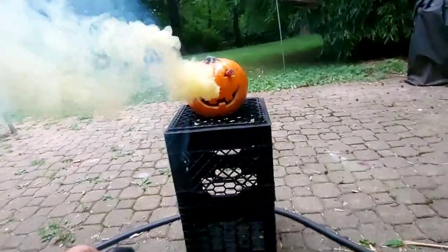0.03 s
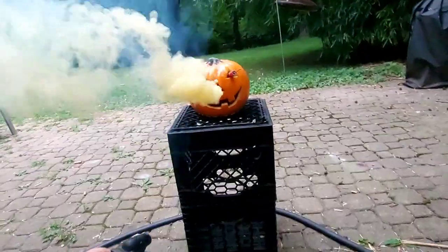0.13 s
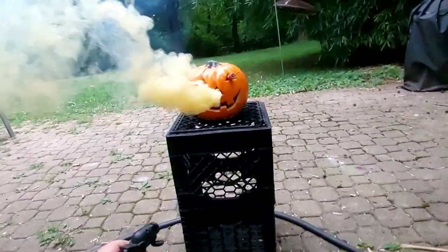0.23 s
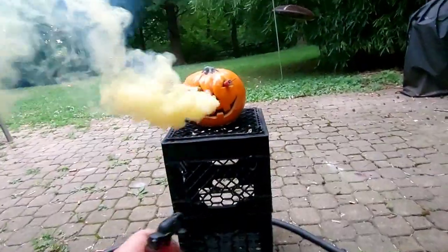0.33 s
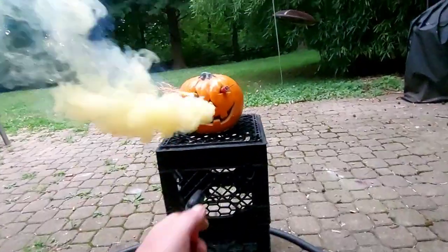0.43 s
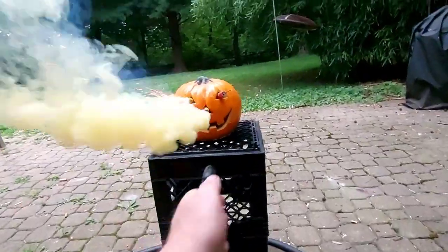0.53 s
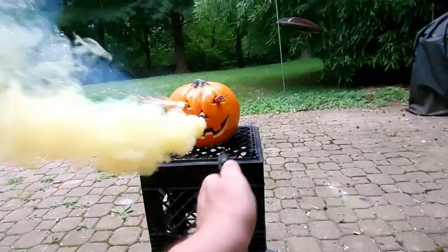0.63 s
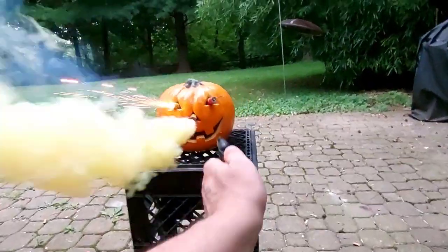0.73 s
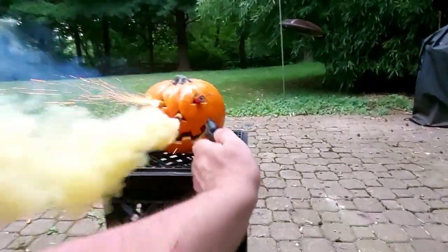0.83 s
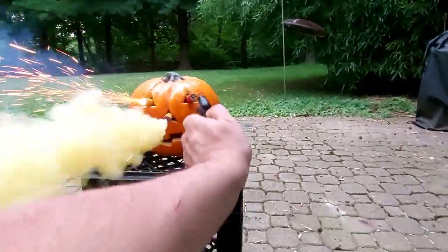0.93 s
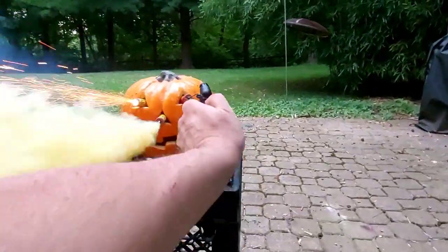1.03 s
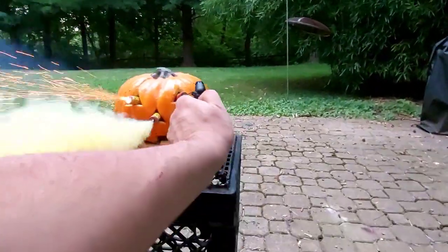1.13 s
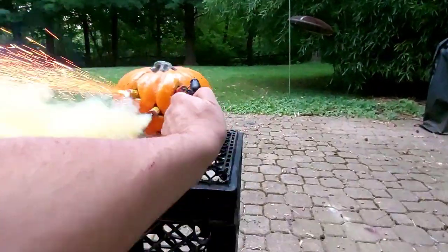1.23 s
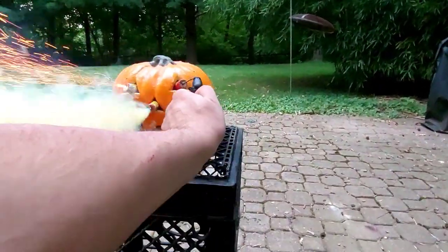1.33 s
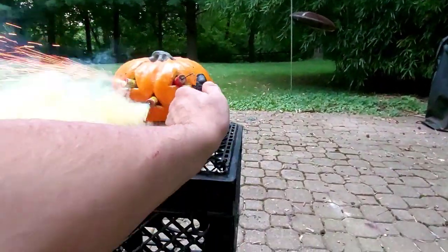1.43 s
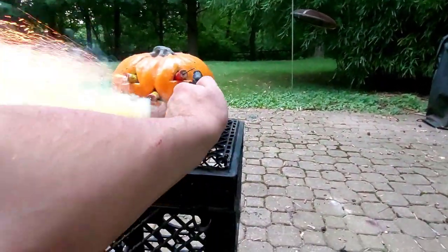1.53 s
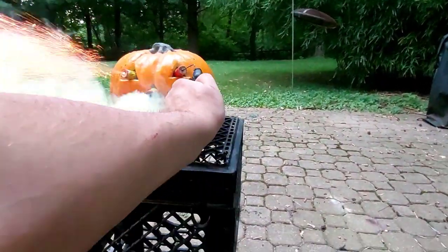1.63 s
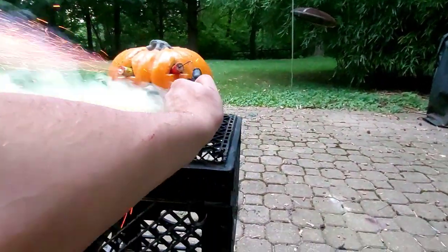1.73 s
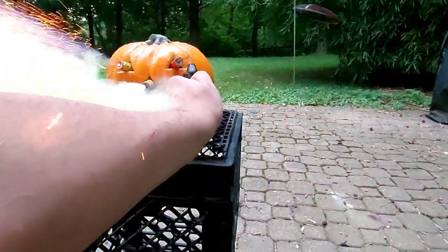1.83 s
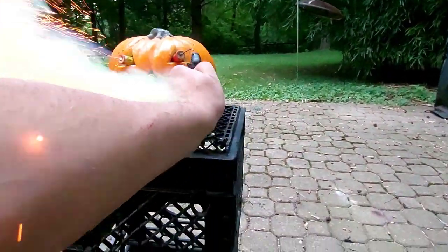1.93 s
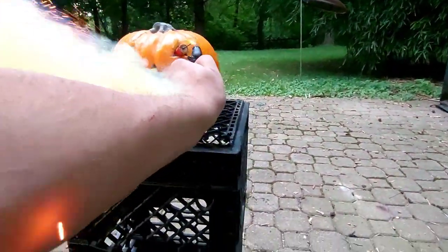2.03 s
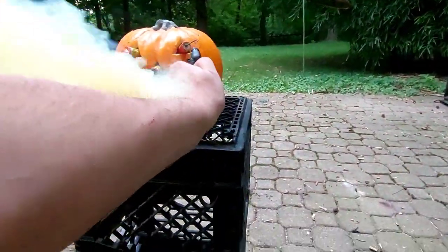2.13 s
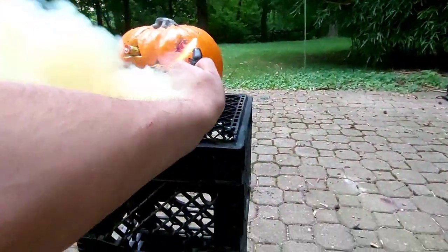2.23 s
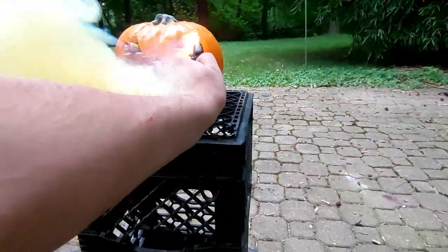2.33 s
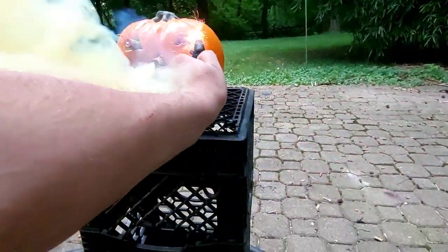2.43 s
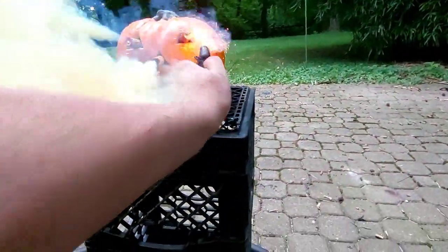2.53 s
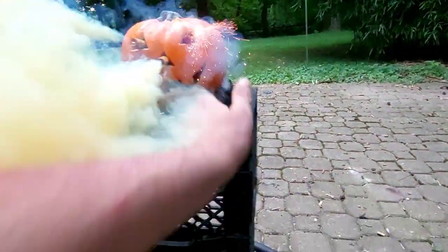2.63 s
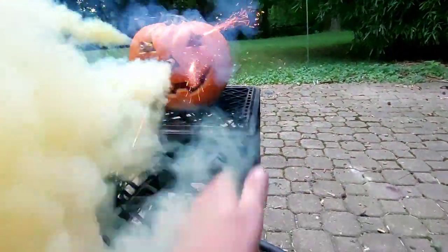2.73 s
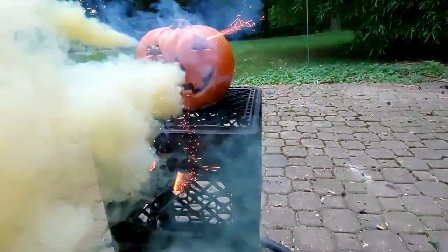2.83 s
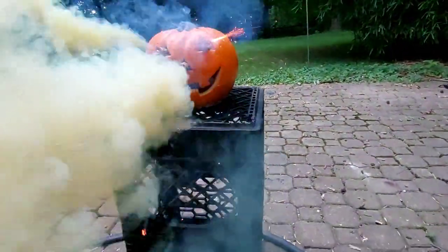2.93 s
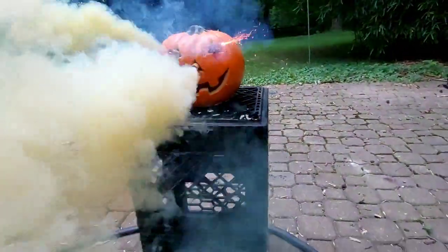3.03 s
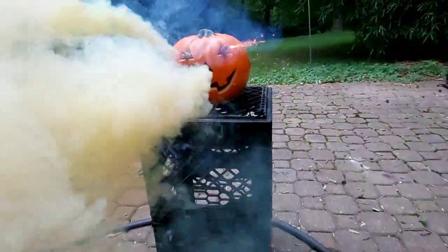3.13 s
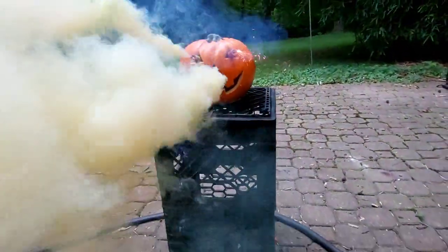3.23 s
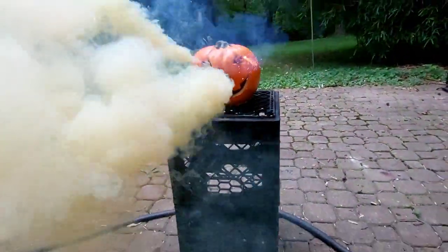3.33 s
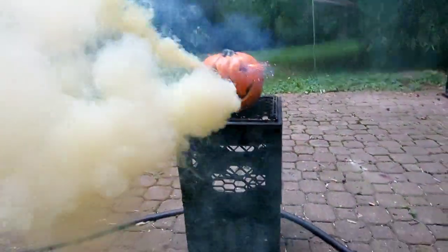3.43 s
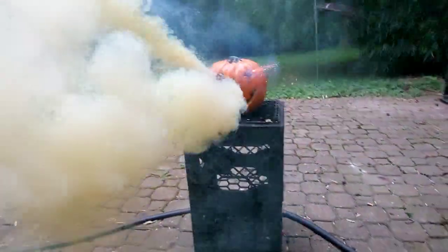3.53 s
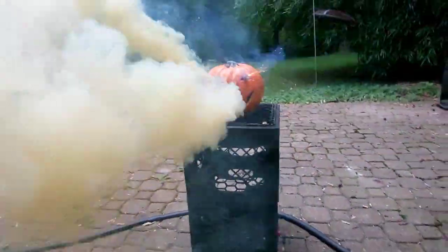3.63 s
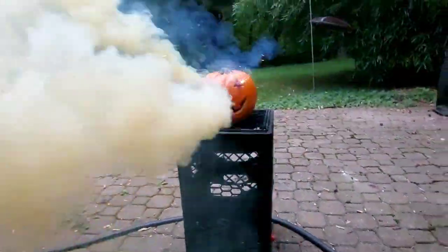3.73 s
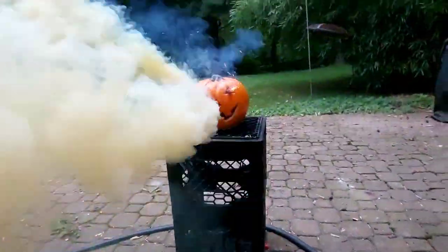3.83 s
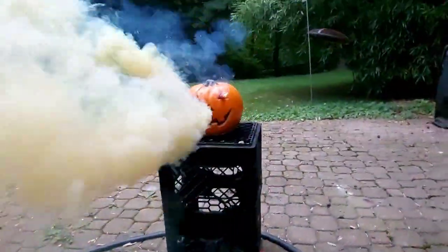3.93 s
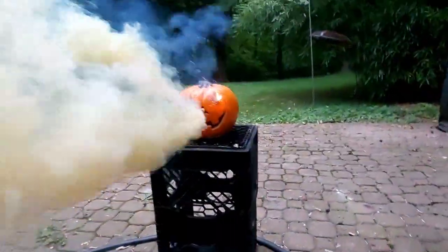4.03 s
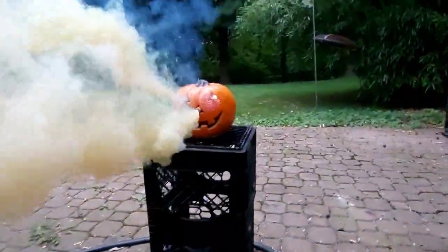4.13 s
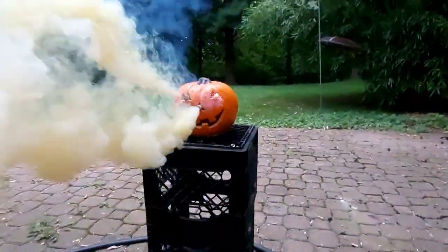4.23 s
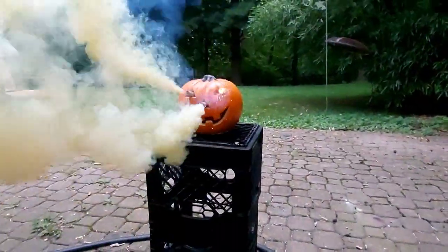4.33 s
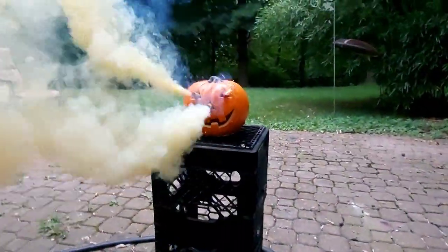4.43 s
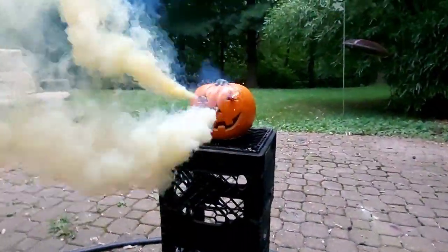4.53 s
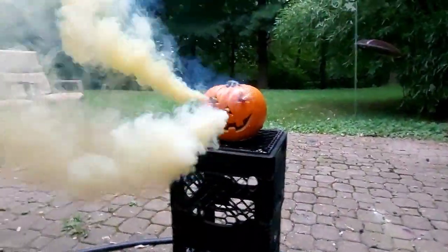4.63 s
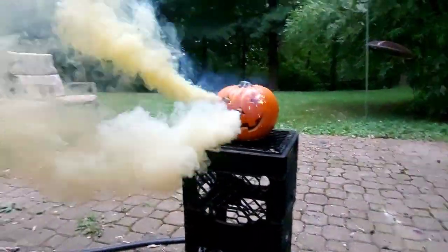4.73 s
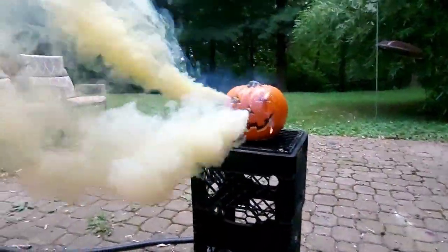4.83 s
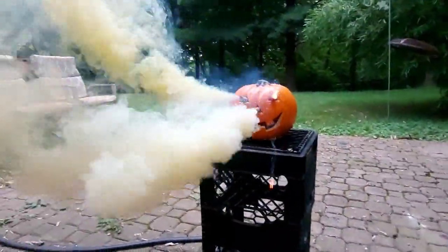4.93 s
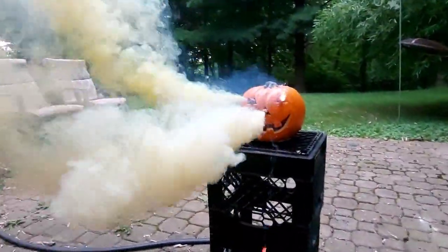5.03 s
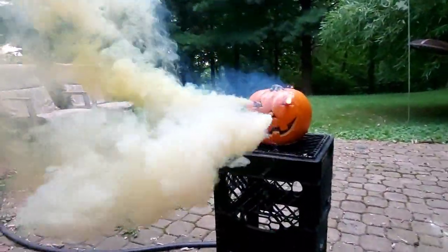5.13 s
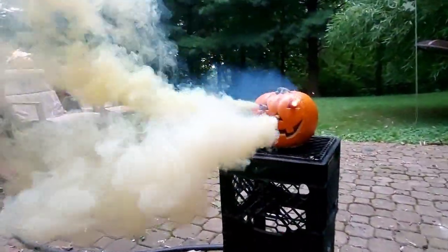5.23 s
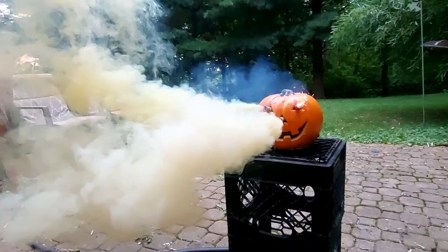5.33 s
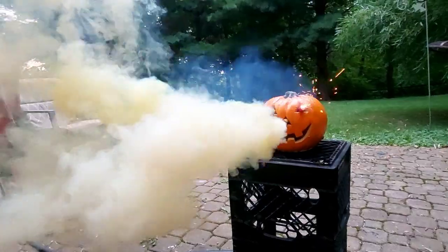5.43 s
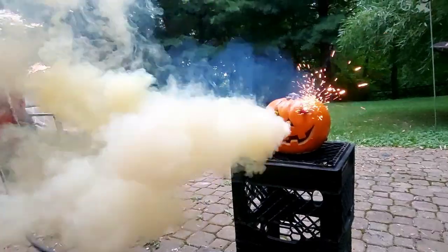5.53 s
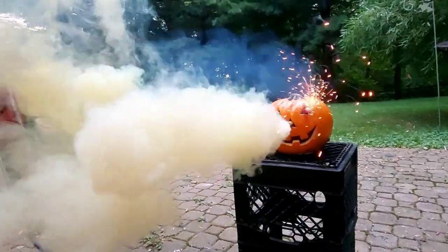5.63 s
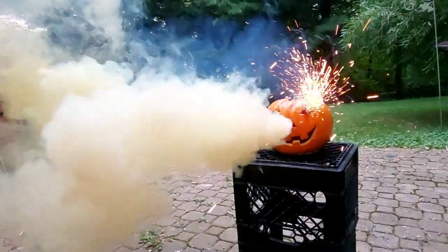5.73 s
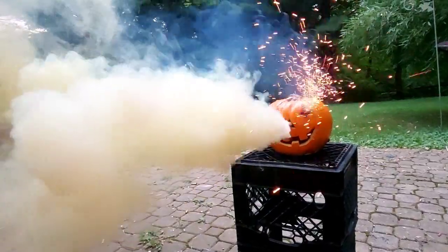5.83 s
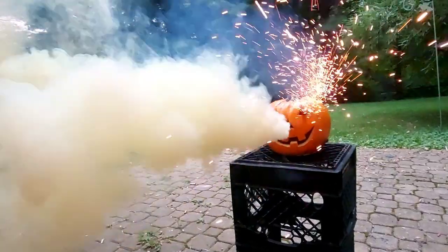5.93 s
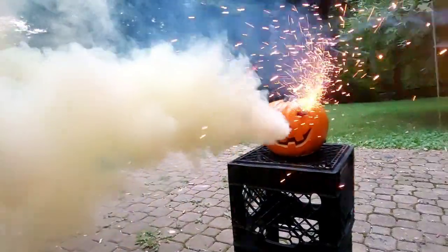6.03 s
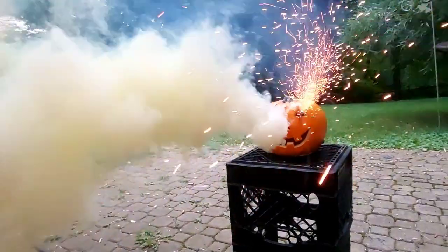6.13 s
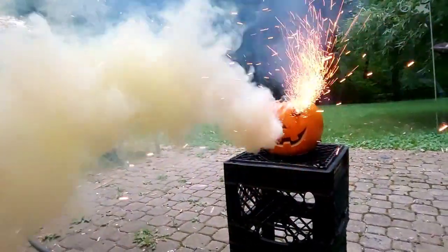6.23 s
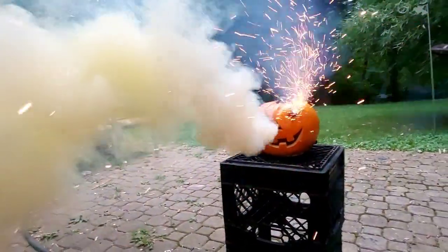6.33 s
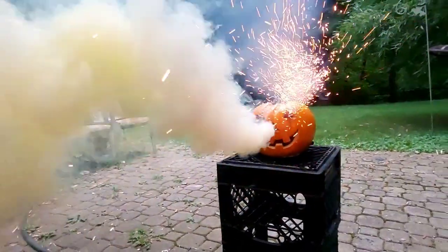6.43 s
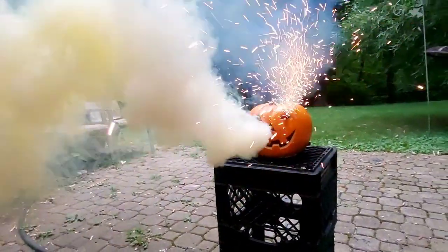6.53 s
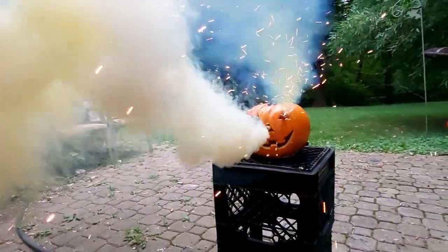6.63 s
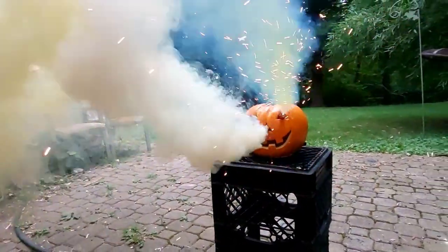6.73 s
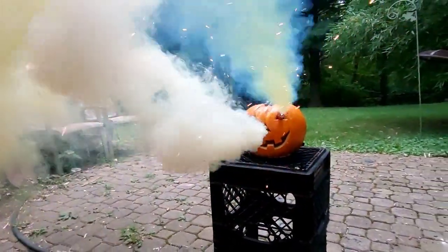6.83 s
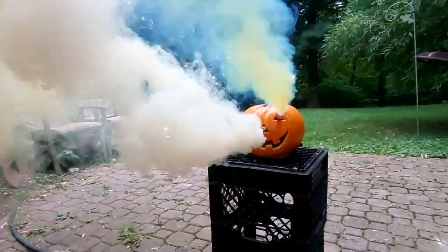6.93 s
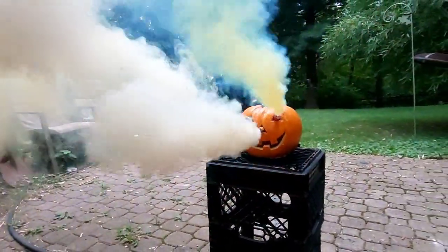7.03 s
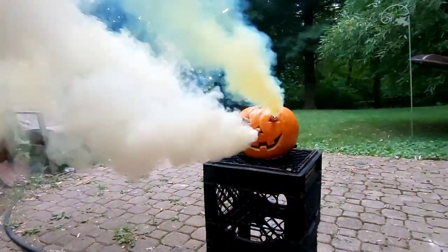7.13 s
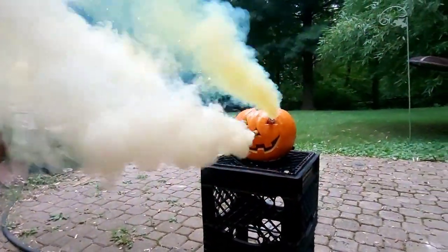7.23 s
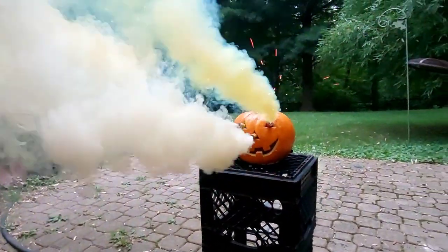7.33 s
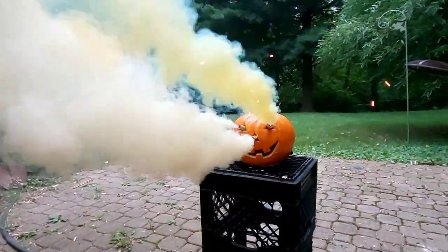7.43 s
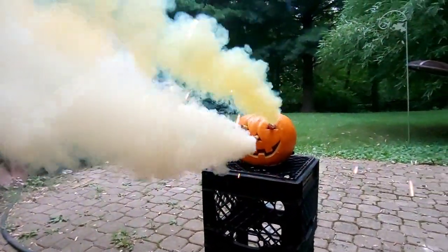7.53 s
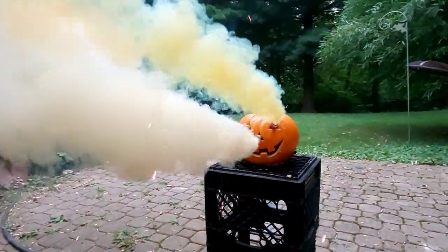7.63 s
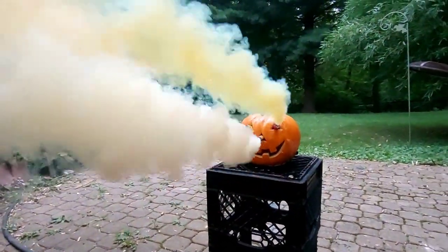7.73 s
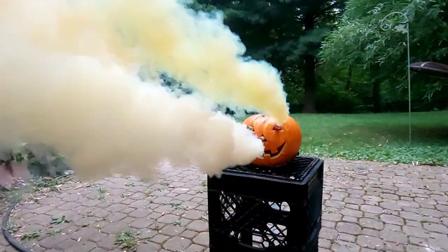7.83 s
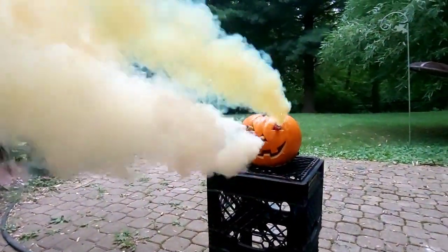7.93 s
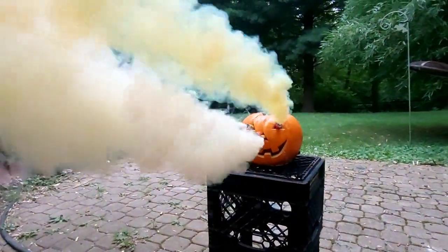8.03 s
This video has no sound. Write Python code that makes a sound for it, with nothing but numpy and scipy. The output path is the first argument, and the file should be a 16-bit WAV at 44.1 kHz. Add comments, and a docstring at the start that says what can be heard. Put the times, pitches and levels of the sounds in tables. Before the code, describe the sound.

Smoke bombs burn inside a hollow pumpkin on an outdoor patio. A soft hiss and low throbbing hum swell into a bright, forceful sizzle with woofs and scattered pops, then drop back. After a steadier hissing stretch, a second surge ends in a dense, louder volley of pops, then subsides to hiss. The handheld stereo microphone moves in close, backs away and sways.

```python
"""Outdoor patio: smoke bombs burn inside a carved pumpkin on a plastic crate.
Their jets, bands of fluttering noise, hiss and surge twice; each surge ends in separate pops, paired pressure pulses.
The hollow pumpkin hums, an unsteady tone over low rumble, and flame woofs and whooshes inside it.
The microphone moves in close, then backs away and sways; echoes and a scattered wash surround the source."""
import sys
import numpy as np
from scipy import signal
from scipy.fft import rfft, irfft, next_fast_len
from scipy.io import wavfile
from scipy.ndimage import uniform_filter1d

SR = 44100
rng = np.random.default_rng(int(sys.argv[2]) if len(sys.argv) > 2 else 0)


def unload_wav(signal):
    """Save mono or channel-first audio to the path in sys.argv[1] as 16-bit WAV at rate SR, clipped to [-1, 1]."""
    wavfile.write(
        sys.argv[1],
        SR,
        np.round(np.clip(np.atleast_2d(signal).T, -1, 1) * 32767).astype(np.int16),
    )


N = 356328
TIME = np.arange(N) / SR   # s
PADDED = next_fast_len(N + 8192)   # room for filter tails
FREQ = np.maximum(np.arange(PADDED // 2 + 1) * SR / PADDED, 1)   # Hz


def from_db(db):
    """Decibels to gain."""
    return 10 ** (np.asarray(db) / 20)


def rms_one(x):
    """Scale to unit power."""
    return x / np.sqrt(np.mean(x ** 2) + 1e-20)


def in_time(rows):
    """Each column of a curve, joined by straight lines, at every sample."""
    time_s, *columns = np.transpose(rows)
    return [np.interp(TIME, time_s, column) for column in columns]


def over_hz(points):
    """A table over frequency, joined on a log axis."""
    hz, value = np.transpose(points)
    return np.interp(np.log(FREQ), np.log(hz), value)


def filtered(x, response):
    """Apply a frequency response."""
    return irfft(rfft(x, PADDED) * response, PADDED)[..., :N]


def drift(rate_hz):
    """Random wandering with spread 1: noise falling off above a rate."""
    return rms_one(filtered(rng.standard_normal(N), 1 / (1 + (FREQ / rate_hz) ** 2)))


def bell(center_s, spread_s):
    """A smooth bump of height 1 around a moment."""
    return np.exp(-.5 * np.minimum(((TIME - center_s) / spread_s) ** 2, 100))


def swells(rows):
    """Brief rises or dips of level, in dB."""
    return sum(db * bell(center_s, spread_s) for center_s, spread_s, db in rows)


def resonance(hz, width_hz):
    """Response of one resonance, 1 at its top."""
    return 1 / (1 + 1j * (FREQ ** 2 - hz ** 2) / (FREQ * width_hz))


# likeness of sound from all sides at the two ears: pitch_hz, correlation
EAR_LIKENESS = [(60, 0.7), (300, 0.28), (700, 0), (1500, 0), (3000, 0), (16000, 0)]


def all_round(colour):
    """Noise of a given response arriving from all sides, partly alike at the two ears."""
    alike = np.clip(over_hz(EAR_LIKENESS), -1, 1)
    mid, side = filtered(rng.standard_normal((2, N)), colour * np.sqrt([1 + alike, 1 - alike]))
    return rms_one(np.array([mid + side, mid - side]))


# draught through the hollow pumpkin, before trims: time_s, hum_db, rumble_db
DRAUGHT = [(0, -50, -53), (.2, -55.5, -62), (.4, -48, -53.5), (1.05, -46, -51.5), (1.2, -58, -56),
           (2.05, -58, -58), (2.4, -73, -67), (2.8, -51.5, -62), (3.12, -62, -66), (3.22, -57, -46.5),
           (3.5, -50.5, -51.5), (3.83, -45, -51), (3.91, -37.5, -53), (4.08, -43, -50), (4.32, -38.5, -50),
           (4.42, -48, -52.5), (4.65, -43, -53.5), (5.3, -43.5, -49.5), (5.53, -53, -53), (5.63, -44, -50),
           (6, -49, -48), (6.55, -54, -56), (6.8, -46.5, -54), (7.2, -57, -58.5), (8.08, -48.5, -53.5)]
# its air resonance, which the hum wanders around: time_s, pitch_hz
HUM_PITCH = [(0, 135.2), (.6, 127), (1.1, 124), (2.8, 132.7), (3.8, 124), (4.2, 110.7), (4.7, 110),
             (5.5, 113.7), (6.2, 121.1), (8.08, 121.6)]
# spectrum of the rumble: pitch_hz, level_db (relative)
RUMBLE_SPECTRUM = [(20, -24), (35, -13), (45, -1), (58, -0.5), (72, -0.5), (88, -8), (108, 1.5), (135, -14),
                   (200, -10.5), (270, -14), (370, -56), (2000, -68)]
THROBS_PER_S, THROB_DEPTH = 11, 0.33   # the hum swells and sags, on average this often


def hollow_hum(waver, wander_hz, hum_trim_db, rumble_trim_db):
    """The jets blow the pumpkin like a bottle: a throbbing hum over the rumble of the billowing smoke."""
    hum_db, rumble_db = in_time(DRAUGHT)
    pitch_hz = in_time(HUM_PITCH)[0] + wander_hz * drift(8.2)
    phase = 2 * np.pi * np.cumsum(pitch_hz) / SR
    throb_hz = THROBS_PER_S * (1 + 0.288 * drift(3.4))
    throb = 1 + THROB_DEPTH * np.cos(2 * np.pi * np.cumsum(throb_hz) / SR)
    unsteady = (1 + waver * drift(21)) * np.cos(phase) + waver * drift(23) * np.sin(phase)
    hum = from_db(hum_db + hum_trim_db) * rms_one(throb * unsteady)
    rumble = from_db(rumble_db + rumble_trim_db) * all_round(from_db(over_hz(RUMBLE_SPECTRUM)))
    return hum + rumble


def jet_noise(spectrum, flutter_db):
    """Turbulence at a vent, its level fluttering with the flow."""
    turbulence = rng.standard_normal(N) * from_db(flutter_db)
    return rms_one(filtered(turbulence, from_db(over_hz(spectrum))))


# force of the jets, before trims: time_s, sizzle_db, hiss_db
JET_FORCE = [(0.04, -47, -49), (.17, -47, -50.5), (.23, -53, -48), (0.42, -50.5, -47), (0.5, -43.5, -50),
             (0.82, -38.5, -47), (0.95, -36.5, -35.5), (1.18, -26, -32.5), (1.45, -26, -35),
             (1.73, -26, -36), (1.88, -31, -46), (2, -28, -43), (2.2, -32.5, -45.5), (2.37, -33.5, -48),
             (2.46, -40, -49), (2.58, -41, -48), (2.76, -42, -48), (2.88, -43, -50), (3.13, -43.5, -46.5),
             (3.29, -47, -49.5), (3.55, -43.5, -48), (3.85, -40.5, -44.5), (3.92, -37.5, -43.5),
             (4.4, -37, -42), (4.7, -35, -41), (4.92, -35, -41.5), (5.34, -33.5, -41.5), (5.63, -32.5, -35),
             (6.0, -29, -33.5), (6.25, -28.5, -34.5), (6.55, -34, -35.5), (6.66, -35, -36.5),
             (6.82, -36.5, -39.5), (7.08, -42, -46.5), (7.6, -39, -45.5), (8.04, -37, -44.5)]
# vigour of the burning, which builds up and cuts out twice, before trims: time_s, sputter_db, flame_rush_db
BURN_VIGOUR = [(0.04, -62, -58), (0.75, -50.5, -44.5), (0.85, -46, -41), (0.93, -48, -40.5),
               (1.28, -48.5, -42), (1.5, -48.5, -45.5), (1.6, -44.5, -37.5), (1.76, -42.5, -39.5),
               (1.79, -50, -39), (1.82, -37.5, -35.5), (1.88, -50, -36), (1.905, -52, -42.5),
               (1.97, -52, -40), (2.0, -45, -34.5), (2.025, -58, -43), (2.14, -45, -41.5),
               (2.19, -53, -46.5), (2.27, -77, -55), (2.42, -54, -41), (2.47, -56.5, -49),
               (3.4, -61, -50.5), (3.68, -55, -57), (3.8, -49.5, -49.5), (4.1, -50.5, -54),
               (4.23, -47, -60), (4.4, -72, -51), (4.49, -55.5, -48), (5.41, -53, -58.5),
               (5.62, -53.5, -40), (5.73, -49.5, -54), (5.8, -47.5, -43.5), (5.93, -43, -46.5),
               (5.99, -43, -37), (6.09, -44, -37), (6.15, -42, -35), (6.3, -38, -32.5), (6.44, -40, -37),
               (6.49, -35.5, -33), (6.545, -39, -40), (6.565, -48, -43), (6.6, -38, -35), (6.64, -56, -44),
               (6.77, -46, -47), (6.85, -45, -54), (6.93, -73, -54), (7.06, -70, -53), (7.22, -78, -54),
               (7.7, -72.5, -55), (8.04, -56.5, -53)]
# spectra of the three ranges: pitch_hz, level_db (relative, per Hz)
SIZZLE_SPECTRUM = [(6000, -59), (9000, -4), (9800, -2), (10800, 1), (12000, 6), (13000, 6), (14500, 6.5),
                   (15700, 6.5), (16000, -28)]
HISS_SPECTRUM = [(1500, -51), (3300, -26), (4200, -3.5), (5000, 3), (6000, 4), (7200, 3.5), (8500, 3.5),
                 (10000, -5), (12000, -9)]
RUSH_SPECTRUM = [(200, -44), (470, -38), (590, -1.5), (720, -3.5), (950, -0.5), (1200, -0.5), (1700, -1.5),
                 (2300, -1), (3200, 1.5), (3700, 1.5), (4400, -0.5), (6000, -8), (12000, -45)]
# the jet spurts or falters for an instant: center_s, spread_s, level_db
JET_FALTERS = [(1.105, 0.016, 2.5), (1.134, 0.012, -7.5), (1.31, 0.008, 0), (6.33, 0.012, -0.5)]
# the flame flares up or sinks in the fountain: center_s, spread_s, level_db
FLAME_FLARES = [(5.8, 0.018, 4.5), (5.975, .014, 3.5), (6.158, 0.024, 4.5), (6.333, 0.023, 3),
                (6.461, 0.01, -16)]


def jets():
    """The escaping gas in three ranges; the bright ones share part of their flutter, the lowest follows the flame."""
    sizzle_db, hiss_db = in_time(JET_FORCE)
    rush_db = in_time(BURN_VIGOUR)[1] + swells(FLAME_FLARES)
    # the flame crackles more, the harder it burns
    grain_db = np.interp(rush_db, [-50, -36], [1.2, 3.6]) * drift(310)
    flow_db = 0.8 * drift(25) + swells(JET_FALTERS)
    sizzle = from_db(sizzle_db + 4.0) * jet_noise(SIZZLE_SPECTRUM, flow_db + .5 * drift(33))
    hiss = from_db(hiss_db + 4.5) * jet_noise(HISS_SPECTRUM, flow_db + .5 * drift(28))
    rush = from_db(rush_db + 2.0) * jet_noise(RUSH_SPECTRUM, 1.7 * drift(37) + grain_db)
    return sizzle, hiss + rush


# standing waves of the hollow shell, heard through its openings: pitch_hz, width_hz, strength
SHELL_MODES = [(1160, 150, 0.34), (1517, 34, 0.75), (1970, 53, 0.99), (2303, 117, 0.66), (2780, 420, 0.25),
               (3460, 60, 0.42), (7300, 180, 0.13)]


def shell(x, level_db):
    """Sound made inside leaves coloured by the shell's standing waves."""
    modes = sum(strength * resonance(hz, width_hz) for hz, width_hz, strength in SHELL_MODES)
    return from_db(level_db) * filtered(x, 1 + modes)


# smoke blowing across the carved mouth: time_s, level_db
MOUTH_LEVEL = [(0, -62.5), (.8, -52), (1.1, -55), (2.3, -66), (3.1, -62), (3.95, -56), (4.35, -65.5),
               (5.5, -56), (8.08, -86)]


def mouth_whistle(hz, width_hz):
    """Smoke across the carved mouth: noise through a broad resonance, an airy, barely pitched whistle."""
    air = filtered(rng.standard_normal(N), resonance(hz, width_hz) ** 2)
    return from_db(in_time(MOUTH_LEVEL)[0]) * rms_one(air)


def blast(t, ms, front=0.3, back=0.61, suction=0.62):
    """A puff of gas: a steep compression, then a longer rarefaction of equal area."""
    u = t * 1000 / ms   # time in units of compression to rarefaction
    push = np.exp(-.5 * (u / front) ** 2)
    early_pull = np.exp(-.5 * ((u - 1) / back) ** 2) / back * suction
    late_pull = np.exp(-.5 * (u - 2) ** 2) * (1 - suction)
    return push - front * (early_pull + late_pull)


def sputter(per_s, ms, spread_db, clump_db):
    """Grains of the charge flare at random and in clumps, each a small blast, in three lengths."""
    born = rng.random(N) < per_s * from_db(clump_db * drift(25)) / SR
    sizes = born * from_db(spread_db * np.minimum(rng.exponential(1, N), 3))
    length_class = rng.integers(0, 3, N)
    t = np.arange(-256, 512) / SR
    total = np.zeros(N)
    for k, scale in enumerate((.6, 1, 1.6)):
        shape = blast(t, ms * scale)
        grains = sizes * (length_class == k)
        total += signal.oaconvolve(grains, shape - shape.mean())[256:256 + N]
    return rms_one(total)


# resonances that colour the long puffs: pitch_hz, width_hz, level_db (relative)
CAVITY_MODES = [(124, 45, 1), (252.5, 47, 4), (354, 73, -4), (497, 54, 0), (680, 100, -34)]
# long puffs follow the sputter up to a ceiling; above it only the short crackle grows
PUFF_DB, PUFF_CEILING_DB = -2.5, -44.5


def burning(crackle_db, uneven_db, crackle_low_hz, ring_db):
    """Fine crackle, slower puffs and single pops; puffs and pops set the cavity ringing."""
    vigour_db = in_time(BURN_VIGOUR)[0] + swells(FLAME_FLARES)
    unsteady = from_db(uneven_db * drift(4.0))
    cavity = sum(from_db(db) * resonance(hz, width_hz) for hz, width_hz, db in CAVITY_MODES)
    thin = signal.butter(2, crackle_low_hz, "high", fs=SR, output="sos")
    short_grains = sputter(per_s=800, ms=0.39, spread_db=3.5, clump_db=3.5)
    crackle = from_db(vigour_db + crackle_db) * rms_one(signal.sosfilt(thin, short_grains))
    long_grains = sputter(per_s=400, ms=0.51, spread_db=3.5, clump_db=2.5)
    puff_db = np.minimum(vigour_db + PUFF_DB, PUFF_CEILING_DB)
    puffs = from_db(puff_db) * rms_one(filtered(long_grains, cavity))
    popping = pops(level_db=-1.45)
    ringing = from_db(ring_db) * filtered(popping, cavity)
    return unsteady * (crackle + puffs) + popping + ringing


# a whoosh falls into the first woof: start_s, end_s, from_hz, to_hz, level_db
FALLING_WHOOSH = (.742, .835, 1430, 300, -41)


def whoosh(width_hz):
    """A narrow band of noise sliding down in pitch."""
    start_s, end_s, from_hz, to_hz, level_db = FALLING_WHOOSH
    along = np.clip((TIME - start_s) / (end_s - start_s), 0, 1)
    phase = 2 * np.pi * np.cumsum(from_hz * (to_hz / from_hz) ** along) / SR
    band = drift(width_hz) * np.cos(phase) + drift(width_hz) * np.sin(phase)
    return from_db(level_db) * np.sin(np.pi * along) * band


# low woofs of flame inside the shell: start_s, decay_s, body_db, opening_blast_db
FLAME_WOOFS = [(0.8193, 0.048, -35.5, -24), (1.7207, 0.019, -28, -26), (1.994, 0.022, -37.5, -30),
               (2.044, 0.012, -30, -27), (4.161, 0.045, -41, -34), (4.24, 0.027, -39, -31),
               (4.552, 0.0068, -48.5, -38), (5.9645, 0.016, -31, -22.5)]
WOOF_FRONT_MS, WOOF_ATTACK_S = 1.6, 0.0045   # length of the opening blast; rise of the body


def woofs(hz, width_hz):
    """A gush of flame opens with a slow blast and stirs the cavity's second resonance, which dies away."""
    body, fronts = np.zeros(N), np.zeros(N)
    for start_s, decay_s, body_db, front_db in FLAME_WOOFS:
        age = np.maximum(TIME - start_s, 0)
        rise = 1 - np.exp(-age / WOOF_ATTACK_S)
        body += from_db(body_db) * rise * np.exp(-np.minimum(age / decay_s, 20))
        fronts += from_db(front_db) * blast(np.clip(TIME - start_s, -.05, .05), WOOF_FRONT_MS)
    stirred = filtered(rng.standard_normal(N), resonance(hz, width_hz) ** 2)
    return body * rms_one(stirred) + fronts


def blasts(rows, shock, shock_ms):
    """Single blasts from rows of (s, dB, ms), each with a snap at its crest, weaker in the quiet ones."""
    out = np.zeros(N)
    for start_s, db, ms in rows:
        near = slice(int((start_s - .005) * SR), int((start_s + .015) * SR))
        t = TIME[near] - start_s
        edge = -t * 1000 / shock_ms
        snap = shock * min(from_db(db + 26), 1) * edge * np.exp(-.5 * edge ** 2)
        out[near] += from_db(db) * (blast(t, ms, front=0.28, back=0.4, suction=0.95) + snap)
    return out


# the loudest pops of gas, as each surge ends, before trims: start_s, level_db, compression_to_rarefaction_ms
LOUD_POPS = [(1.163, -25.5, 0.6), (1.2614, -21.5, 0.32), (1.4488, -22.5, 0.38), (1.478, -27, 0.42),
             (1.49, -31, .5), (1.55, -31, 0.8), (1.5759, -29.5, 1), (1.5842, -23, 0.28), (1.6485, -34, .5),
             (1.7254, -20, 0.37), (1.7381, -25, 0.47), (1.7748, -20.5, 0.36), (1.8051, -26, 0.59),
             (1.8347, -28.5, 0.7), (1.8458, -22, 0.3), (1.8657, -28, 0.26), (1.8806, -21, 0.3),
             (1.9528, -20, 0.46), (1.9801, -19, 0.21), (1.9946, -22, 0.29), (2.0047, -18, 0.22),
             (2.0436, -21, 0.38), (2.046, -17.5, 0.55), (2.1038, -20, 0.43), (2.1346, -28, .45),
             (2.158, -24, 0.42), (2.1827, -20, 0.46), (5.8038, -24.5, 0.45), (5.8234, -25.5, 0.72),
             (5.8718, -27, .55), (5.9598, -21, 0.47), (6.0419, -27, .35), (6.0558, -23, 0.52),
             (6.0674, -22, 0.51), (6.1128, -22, .32), (6.14, -20, 0.4), (6.151, -21, 0.48),
             (6.1569, -19, 0.66), (6.1683, -25, .4), (6.1798, -20, 0.65), (6.2092, -16, .4),
             (6.2423, -26, 0.32), (6.2647, -24, 0.25), (6.2916, -23, 0.33), (6.3248, -21, 1),
             (6.329, -15, 0.28), (6.3434, -17.5, 0.79), (6.378, -17, 0.5), (6.4378, -29, 0.22),
             (6.4432, -22, 0.41), (6.4476, -18.5, 0.42), (6.473, -14, 0.21), (6.4891, -20, 0.36),
             (6.4926, -17, 0.73), (6.4991, -19, 0.24), (6.509, -23, 0.33), (6.5116, -17, 0.35),
             (6.5172, -20, 0.29), (6.5263, -15, .3), (6.5361, -12, 0.38), (6.5474, -15.5, 0.28),
             (6.5684, -14, 0.4), (6.5941, -17, 0.24), (6.5996, -15.5, 0.46), (6.6053, -19, 0.5),
             (6.6204, -16, 0.49), (6.6358, -14, 0.24), (6.6524, -16.5, 0.55), (6.67, -14, 0.33),
             (6.6808, -15, 0.47), (6.7032, -18, 0.65), (6.7066, -16, 0.24), (6.7092, -16.5, 0.098),
             (6.7235, -18.5, .4), (6.7403, -15, 0.42), (6.7453, -17, .45), (6.7562, -21, 0.38),
             (6.7572, -12.5, 0.24), (6.7604, -17.5, 0.47), (6.7912, -17.5, 0.52), (6.7996, -14, 0.47),
             (6.8144, -17.5, 0.43), (6.8161, -17.5, 0.18), (6.8494, -16.5, 0.42)]
# lesser pops fall at random while a fuse throws sparks: start_s, end_s, typical level_db before trims
SPARK_FOUNTAINS = [(0.88, 1.418, -35), (1.417, 1.876, -29.5), (5.781, 6.101, -29.5), (6.101, 6.436, -24),
                   (6.471, 6.545, -22)]
SPARK_POP_MS, SPARK_POPS_PER_S = 0.22, 93   # typical length; rate
SPARK_SPREAD_DB = 6   # quietest to loudest within a fountain


def pops(level_db):
    """The loud pops and the lesser ones among the sparks, as single blasts of gas."""
    lesser = []
    for start_s, end_s, typical_db in SPARK_FOUNTAINS:
        for slot_s in np.arange(start_s, end_s, 1 / SPARK_POPS_PER_S):
            late, size, length = rng.random(3) - .5
            pop_db = typical_db + SPARK_SPREAD_DB * size
            lesser.append((slot_s + late / SPARK_POPS_PER_S, pop_db, SPARK_POP_MS * 2 ** length))
    return from_db(level_db) * blasts(list(LOUD_POPS) + lesser, shock=0.69, shock_ms=0.079)


# brief ticks and knocks, each around one pitch: center_s, level_db, pitch_hz, spread_ms
TICKS_AND_KNOCKS = [(1.131, -22, 3100, 0.25), (1.688, -19.5, 2740, 0.32), (6.1275, -6, 11000, 0.043),
                    (6.653, -15.5, 4170, .1), (7.354, -36, 1110, 0.55), (7.357, -36, 950, 0.45)]


def ticks():
    """Short bursts of a cosine under a smooth bump."""
    return sum(from_db(db) * bell(center_s, ms / 1000) * np.cos(2 * np.pi * hz * (TIME - center_s))
               for center_s, db, hz, ms in TICKS_AND_KNOCKS)


# the microphone's path: time_s, left_ear_delay_ms, nearness to the pumpkin (0-1), paving_echo_delay_ms
MIC_PATH = [(0, -0.082, 0.03, 6), (.7, -0.056, 0.6, 4.6), (1.15, -0.16, 0.76, 4.5), (2.6, -0.16, 0.8, 4.33),
            (3.2, -0.064, 0.1, 4.2), (3.8, 0.031, 0, 5.35), (4.35, -0.045, 0, 5.9), (5, 0.081, 0.23, 5.8),
            (5.7, .14, 0.55, 6.1), (6.2, 0.091, 0.42, 6.2), (7, 0.018, 0.16, 5.3), (8.08, 0.031, 0.07, 4.9)]
# near echoes off shell and crate: delay_ms from afar, added_ms close up, gain
NEAR_ECHOES = [(1.5, 0.664, 0.2), (2.5, 0.4, 0.23)]
PAVING_GAIN = 0.4


def patio(x, echo_low_hz, echo_high_hz):
    """Direct sound and near echoes reach the ears one after the other."""
    lag_ms, nearness, paving_ms = in_time(MIC_PATH)
    # small, rough surfaces mirror neither long nor very short waves
    long_waves_lost = 1 + (echo_low_hz / FREQ) ** 4
    short_waves_lost = 1 + (FREQ / echo_high_hz) ** 2
    mirrored = filtered(x, 1 / np.sqrt(long_waves_lost * short_waves_lost))
    echoes = [(ms + added_ms * nearness, gain) for ms, added_ms, gain in NEAR_ECHOES]
    echoes.append((paving_ms, PAVING_GAIN))
    near = x + sum(gain * np.interp(TIME - ms / 1000, TIME, mirrored) for ms, gain in echoes)
    half_lag = lag_ms * SR / 2000   # samples
    fine = irfft(rfft(near, PADDED), 4 * PADDED) * 4   # four times the rate, for smooth delays
    return np.array([np.interp(4 * (np.arange(N) + side * half_lag), np.arange(len(fine)), fine)
                     for side in (-1, 1)])


# how much of the shading each frequency gets: pitch_hz, share
TREBLE_SHADE = [(8800, 0.057), (10300, 1.1), (12500, 1.09), (14000, 0.93), (15800, 0.26)]
SHADE_DB, SHADE_DB_PER_MS = 7, -24   # left-right head-on; per ms of left-ear delay


def shaded(ears):
    """The microphone's housing favours one ear in the top treble, by an amount that follows its turning."""
    shade_db = SHADE_DB + SHADE_DB_PER_MS * in_time(MIC_PATH)[0]
    turned = np.clip(shade_db / 10, -.2, 1.2)
    # blend towards a full 10 dB of shading
    full = filtered(ears, from_db(10 * over_hz(TREBLE_SHADE) * np.array([[.5], [-.5]])))
    return ears + turned * (full - ears)


def scatter(x, decay_s):
    """Foliage, paving and moving smoke return a diffuse wash with the source's colour, trailing its power."""
    colour = np.sqrt(np.abs(uniform_filter1d(np.abs(rfft(x, PADDED)) ** 2, size=400)))
    keep = np.exp(-1 / (decay_s * SR))
    power = signal.lfilter([1 - keep], [1, -keep], x ** 2 + 1e-18)
    return np.sqrt(power) * all_round(colour)


# share of the jets' power straight from the vents, the rest is scattered: time_s, sizzle_share, hiss_share
STRAIGHT_SHARE = [(0, 0.32, 0.4), (.3, 0.45, 0.44), (.9, 0.39, 0.37), (1.15, 0.6, 0.69), (1.5, 0.51, 0.72),
                  (2.3, 0.44, 0.31), (2.5, .34, 0.28), (5.5, 0.15, 0.57), (6.7, 0.24, 0.69),
                  (7.2, 0.24, 0.63), (8.08, .33, 0.53)]
# colour of the two ears: pitch_hz, left_minus_right_db
EAR_BALANCE = [(150, -0.5), (500, 0.5), (1000, -3), (2200, -0.5), (4000, -0.5), (8000, 0.5), (12000, -3)]
WASH_FAR_DB, WASH_NEAR_DB = -4.5, -4   # scattered flame from afar; change right at the pumpkin


def scene():
    """All the burning comes from one spot, the pumpkin; close to it the flame's wash falls behind the direct sound."""
    sizzle, hiss = jets()
    hiss = shell(hiss, level_db=-1.33)
    fire = burning(crackle_db=-1.3, uneven_db=1.5, crackle_low_hz=476, ring_db=-3.5)
    flare = shell(fire, level_db=-0.83) + woofs(hz=269, width_hz=185) + whoosh(width_hz=91)
    sizzle_share, hiss_share = np.clip(in_time(STRAIGHT_SHARE), .01, .99)
    straight = np.sqrt(sizzle_share) * sizzle + np.sqrt(hiss_share) * hiss
    source = straight + flare + mouth_whistle(hz=1320, width_hz=450)
    direct = patio(source, echo_low_hz=560, echo_high_hz=7000)
    sizzle_wash = np.sqrt(1 - sizzle_share) * scatter(sizzle, decay_s=0.008)
    hiss_wash = np.sqrt(1 - hiss_share) * scatter(hiss, decay_s=0.0074)
    wash_db = WASH_FAR_DB + WASH_NEAR_DB * in_time(MIC_PATH)[1] ** 2
    low_wash = from_db(wash_db) * scatter(flare, decay_s=0.0061)
    hum = hollow_hum(waver=0.51, wander_hz=3.08, hum_trim_db=-3.0, rumble_trim_db=-0.5)
    ears = shaded(direct + sizzle_wash + hiss_wash) + low_wash + ticks() + hum
    return filtered(ears, from_db(over_hz(EAR_BALANCE) * np.array([[.5], [-.5]])))


CUTOFF_HZ = 16000


def record(dry):
    """The microphone's signal loses the deepest bass, gently, and the top, steeply."""
    bass_cut = signal.sosfilt(signal.butter(2, 28, "high", fs=SR, output="sos"), dry)
    return filtered(bass_cut, 1 / np.sqrt(1 + (FREQ / CUTOFF_HZ) ** 400))


dry = scene()
out = record(dry)
unload_wav(out)
```